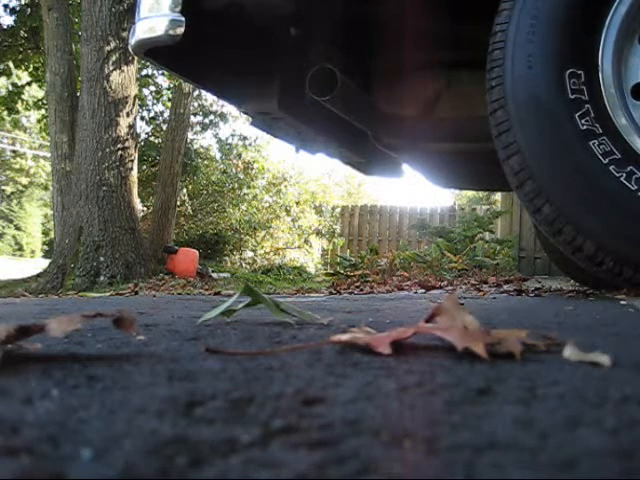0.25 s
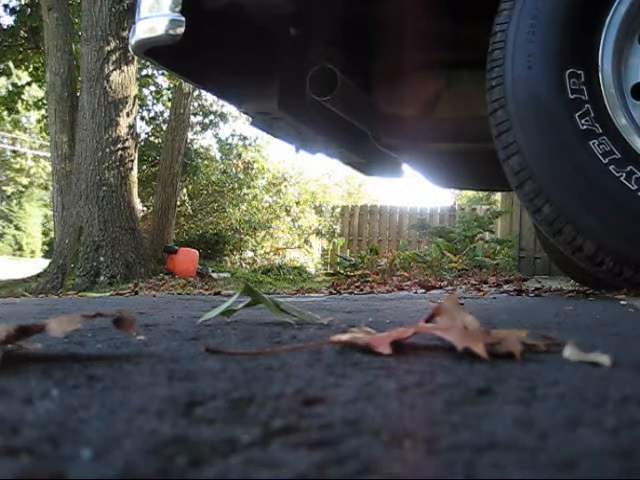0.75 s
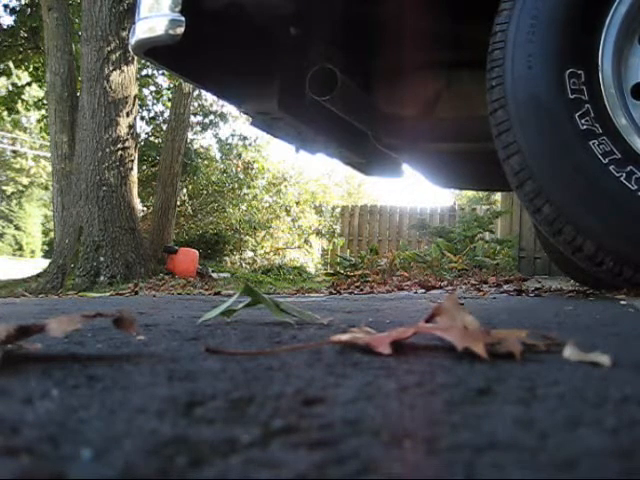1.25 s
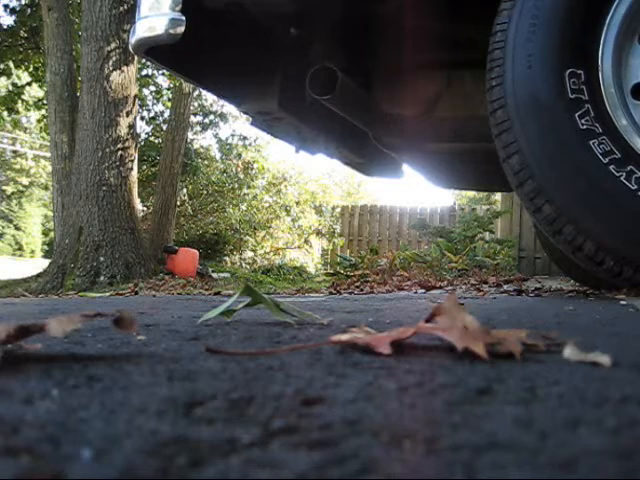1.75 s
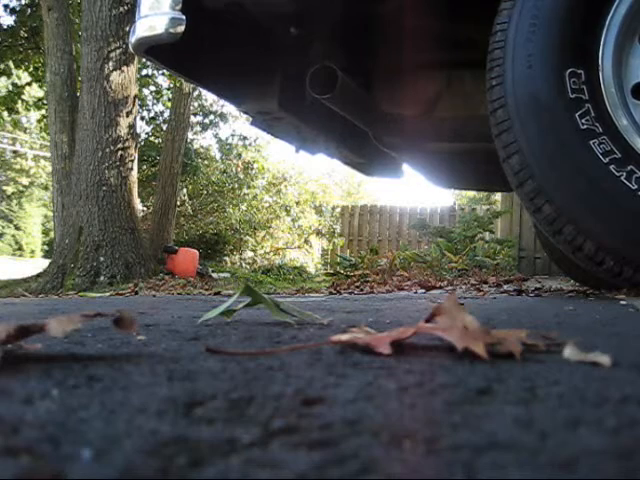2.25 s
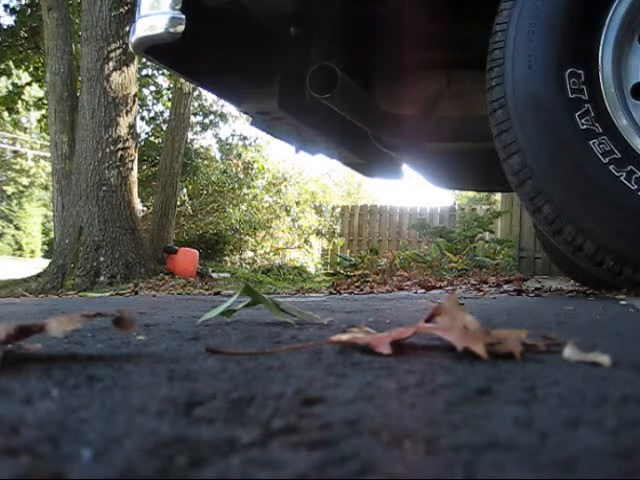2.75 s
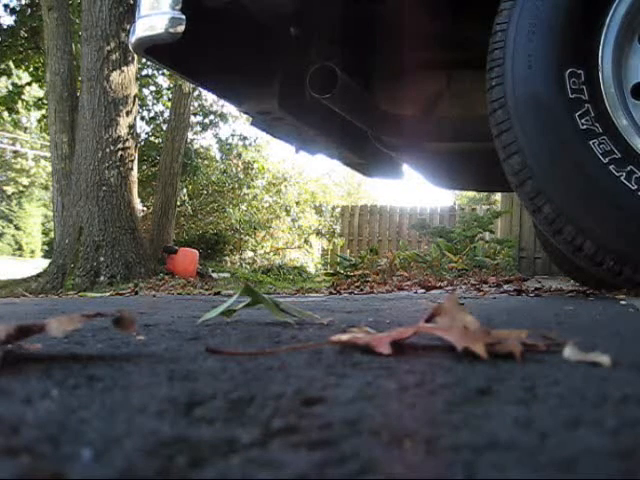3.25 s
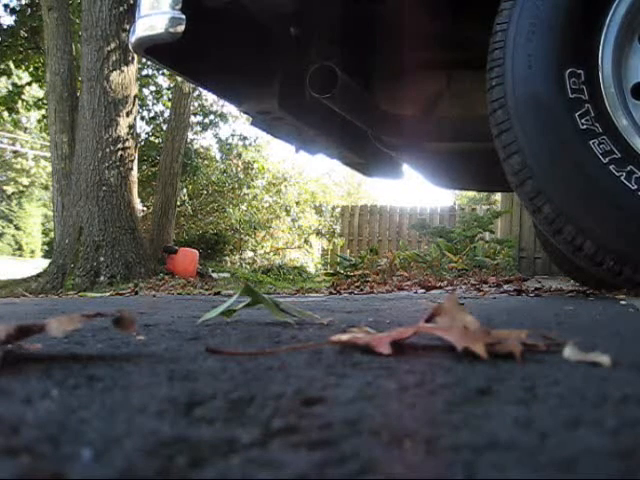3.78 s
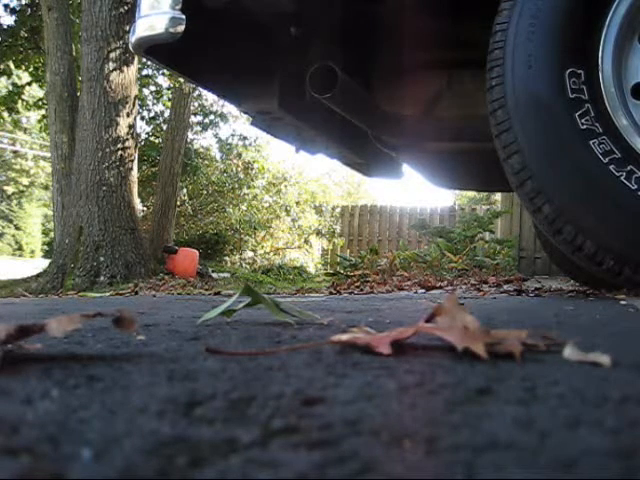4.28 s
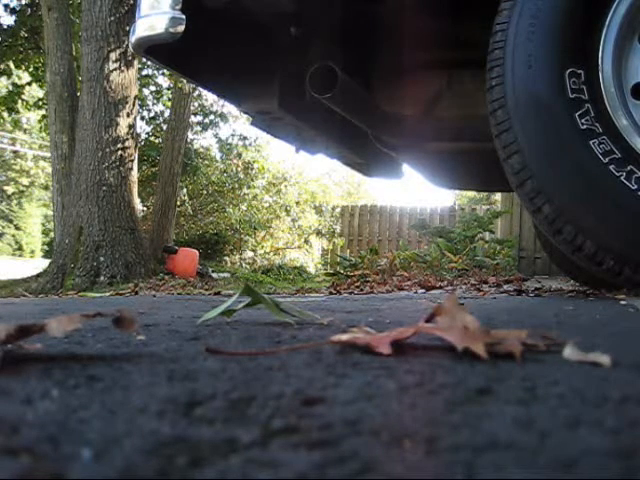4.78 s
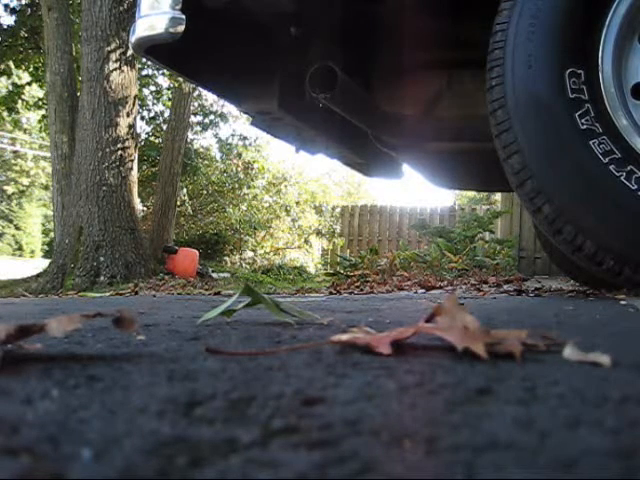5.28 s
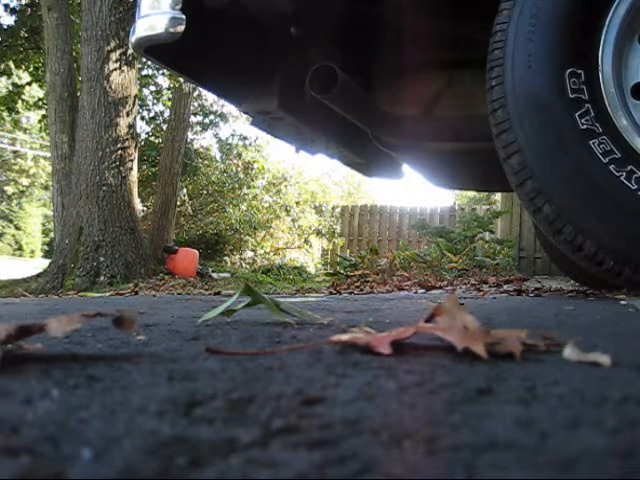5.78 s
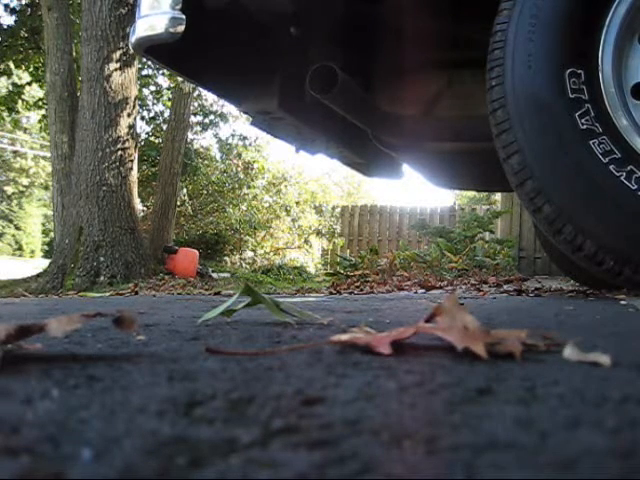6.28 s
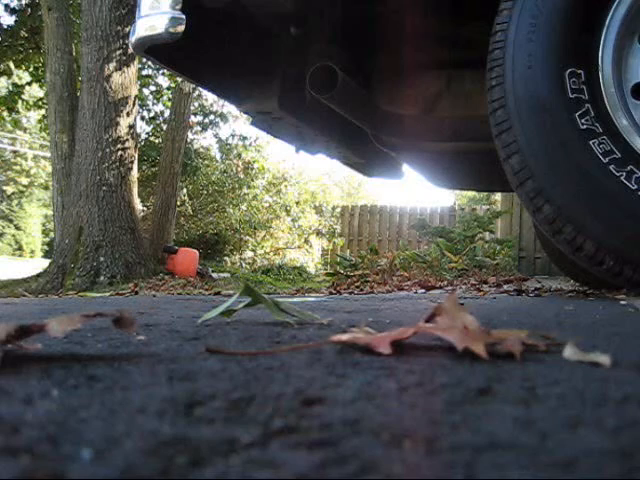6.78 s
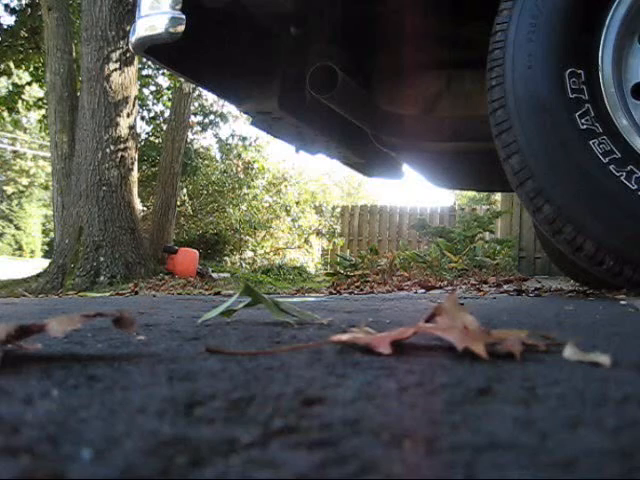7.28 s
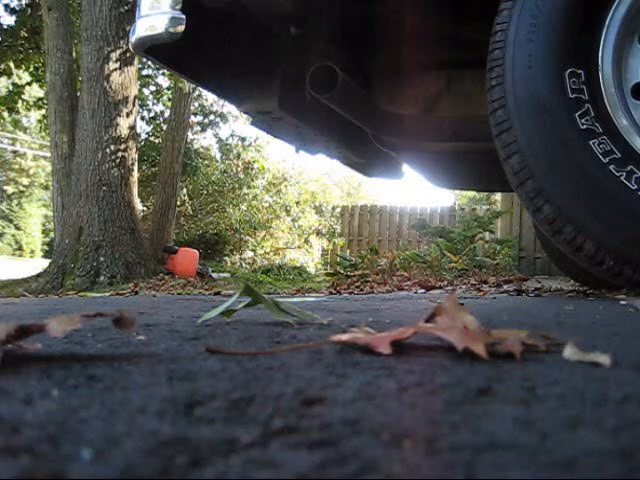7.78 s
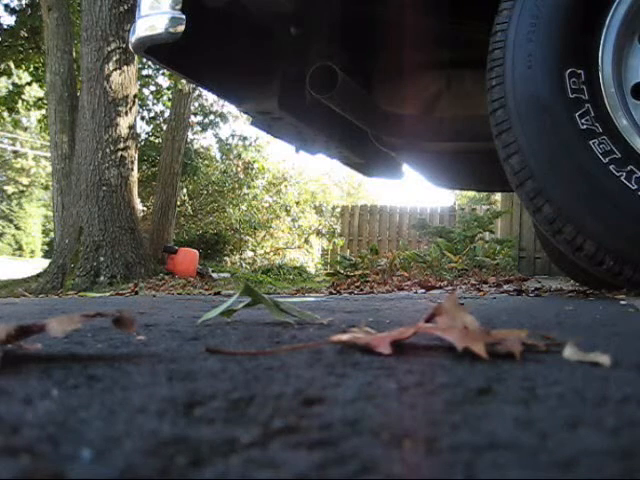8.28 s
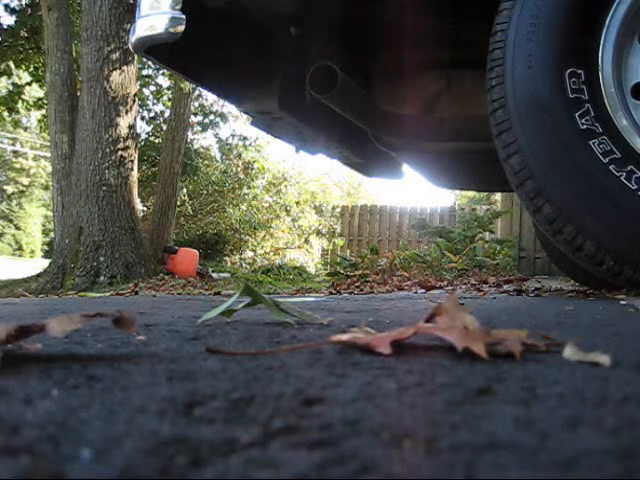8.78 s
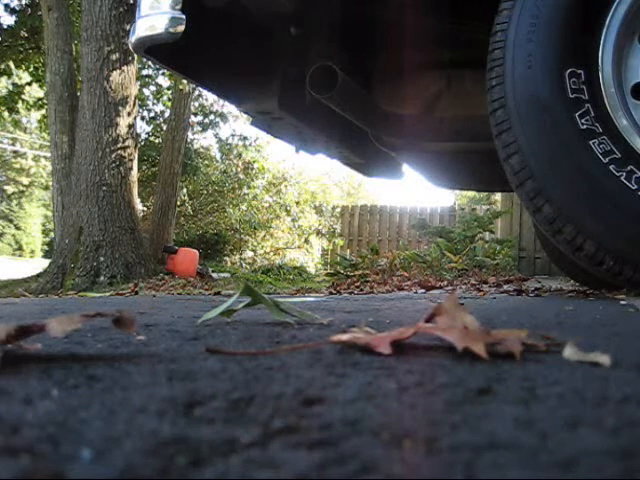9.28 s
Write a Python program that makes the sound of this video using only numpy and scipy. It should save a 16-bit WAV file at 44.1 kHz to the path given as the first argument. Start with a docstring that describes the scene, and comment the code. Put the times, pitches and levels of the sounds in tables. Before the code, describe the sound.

Crickets chirp outdoors as a truck door bangs shut; the V8 cranks, fires up with a roar and sinks toward a steady idle.

```python
"""A V8 truck starts up on a garden driveway, heard from the ground beside it.
The door slams and the body shakes; later the starter clunks in and whines over two compressions.
The engine catches, flares and sinks towards idle: its firings beat in the exhaust under fan roar,
intake hiss and alternator whine, while the freed starter spins down.
Behind it are crickets, a few bird calls and a soft bed of leaves and distant traffic."""
import sys
import numpy as np
from scipy.fft import rfft, irfft, next_fast_len
from scipy.io import wavfile
from scipy.ndimage import map_coordinates

SR = 44100
rng = np.random.default_rng(int(sys.argv[2]) if len(sys.argv) > 2 else 0)


def pcm_store(signal):
    """Save signal as 16-bit PCM."""
    levels = np.round(np.clip(np.atleast_2d(signal), -1, 1) * 32767)
    wavfile.write(sys.argv[1], SR, levels.astype(np.int16).T)


N = 420713
TIME = np.arange(N) / SR
CATCH_S = 5.245  # the engine fires up


def amp(db):
    """Decibels to gain."""
    return 10 ** (np.asarray(db) / 20)


def unit(x):
    """x scaled to rms 1."""
    return x / np.sqrt(np.mean(x ** 2) + 1e-20)


def noise():
    """White noise."""
    return rng.standard_normal(N)


def wobble(rate):
    """A smooth random modulator, rate knots a second."""
    return map_coordinates(rng.standard_normal(int(N * rate / SR) + 4), [TIME * rate], order=2)


def hump(x, centre, width):
    """A bell curve of height 1."""
    return np.exp(-((x - centre) / width) ** 2)


def envelope(start, attack, hold, t60, t=TIME):
    """A straight rise, a hold, then a fall of 60 dB in t60."""
    return np.clip((t - start) / attack, 0, 1) * amp(-60 * np.maximum(t - start - attack - hold, 0) / t60)


def turns(hz):
    """Cycles completed at a changing frequency."""
    return np.cumsum(hz) / SR


def tone(hz, blur, rate):
    """A sine of rms 1 whose pitch trembles by the share blur."""
    return np.sqrt(2) * np.sin(2 * np.pi * turns(hz * (1 + blur * wobble(rate))))


def eq_gain(points, hz):
    """Gain of an EQ curve of (f/Hz, level/dB) points on a log axis."""
    f, db = np.transpose(points)
    return amp(np.interp(np.log(hz + 1), np.log(f), db))


def filtered(x, response):
    """x times a complex response of frequency."""
    size = next_fast_len(N + SR // 2)
    return irfft(rfft(x, size) * response(np.fft.rfftfreq(size, 1 / SR)), size)[..., :N]


def coloured(x, points):
    """x through an EQ curve, at rms 1."""
    return unit(filtered(x, lambda hz: eq_gain(points, hz)))


def resonate(x, modes):
    """x through (f/Hz, width/Hz, level/dB) resonances of alternating polarity, at rms 1."""
    def response(f):
        return sum((-1) ** k * amp(db) * 1j * f * width / (hz * hz - f * f + 1j * f * width)
                   for k, (hz, width, db) in enumerate(modes))
    return unit(filtered(x, response))


def standing_waves(x, peaks, width_hz, widening):
    """x through narrow peaks that broaden with frequency."""
    def response(f):
        return sum(amp(db) / (1 + ((f - hz) / (width_hz + widening * hz)) ** 2) for hz, db in peaks)
    return filtered(x, response)


def strikes(rows, octaves, attack_share):
    """Each hit is a dying band of noise whose attack is a share of its t60."""
    out = np.zeros(N)
    t = TIME[:SR]
    hz = np.fft.rfftfreq(SR, 1 / SR) + 1
    for start, db, centre_hz, t60 in rows:
        band = hump(np.log2(hz / centre_hz), 0, octaves)
        burst = unit(irfft(rfft(rng.standard_normal(SR)) * band, SR))
        rise = 1 - np.exp(-t / (attack_share * t60))
        out[round(start * SR):][:SR] += burst * rise * amp(db - 60 * t / t60)
    return out


def whistles(rows, blur, rate):
    """Each whistle slides to its end pitch and levels off, under an arch of loudness."""
    out = np.zeros(N)
    for start, length, start_hz, end_hz, db in rows:
        progress = np.clip((TIME - start) / length, 0, 1)
        hz = start_hz + (end_hz - start_hz) * np.sin(np.pi / 2 * progress)
        out += amp(db + 2.1 * wobble(100)) * np.sin(np.pi * progress) * tone(hz, blur, rate)
    return out


# EQ of the garden bed: f/Hz, level/dB
GARDEN_EQ = [(25, -17), (60, -6.5), (130, -5.5), (250, -6.5), (600, -2.5), (1000, -3.5), (1500, -6),
             (2900, -6), (4400, -10.5), (6500, -10.5), (7200, -13), (10100, -15.5), (12500, -22),
             (15500, -25.5)]

def garden():
    """Leaves and distant traffic make a soft, even wash."""
    return amp(-36 + 0.46 * wobble(3.52)) * coloured(noise(), GARDEN_EQ)


def crickets():
    """A near cricket repeats one dipping chirp; a far one sings higher and faster over a faint chorus."""
    since = (TIME - .094) % .107  # a chirp every 107 ms
    dip = hump(since, .029, 0.013)
    hz = 5077 - 188 * dip
    scrape = 0.00406 + 0.0222 * dip  # the wing stroke turns raspy in the dip
    chirp = envelope(0, attack=0.0071, hold=0.055, t60=0.09, t=since)
    chirp *= amp(-37.5 - 2 * dip + 2.1 * wobble(90))
    overtone = amp(-14.5) * hump(since, .055, 0.012) * tone(2.02 * hz, blur=.004, rate=700)
    near = chirp * (tone(hz, scrape, rate=700) + overtone)
    stroke = TIME * 10.8 % 1
    far_chirp = amp(-45.5 + 2 * wobble(5)) * np.sin(np.pi * stroke) ** 2
    far = far_chirp * tone(6750 - 450 * stroke, blur=.018, rate=900)
    chorus = amp(-50 + 2.8 * wobble(23)) * tone(5900, blur=.05, rate=1500)
    return near + far + chorus


# thuds in the cab: t/s, level/dB, centre f/Hz, t60/s
CAB_THUDS = [(.368, -26, 506, 0.18), (1.573, -32, 100, 0.27), (1.578, -30.5, 540, 0.25),
             (2.35, -40, 60, .8), (2.41, -39, 240, 1.9), (4.014, -32, 170, 0.32)]

def cab_bumps():
    """Soft, dull knocks come from the cab."""
    return strikes(CAB_THUDS, octaves=1.2, attack_share=0.013)


# door and latch hits: t/s, level/dB, centre f/Hz, t60/s
DOOR_HITS = [(.807, 0, 911, 0.027), (.8095, -8.5, 7000, 0.048), (.8165, -26, 7500, .03),
             (.827, -14, 1700, .18)]
# EQ of the body's boom: f/Hz, level/dB
BOOM_EQ = [(13, -41), (22, -11), (54, 3), (86, -4), (172, 3), (198, -15), (238, 1), (300, -16), (390, -40),
           (660, -120)]
# bursts of panel rattle: t/s, level/dB, attack/s, hold/s, t60/s
RATTLE_BURSTS = [(0.806, -14, .002, .028, .3), (0.878, -21.5, .01, 0.078, 0.38),
                 (0.943, -18, 0.041, 0.027, 0.57)]
# EQ of the rattling panels: f/Hz, level/dB
PANEL_EQ = [(88, -32), (150, -11), (238, -6), (294, -12), (535, -2), (787, -9.5), (866, -5.5), (1050, -9.5),
            (1270, -3), (1800, -14), (2450, -13), (15000, -52)]

def door_slam():
    """Door and latch strike, then the body booms and the panels rattle."""
    hits = strikes(DOOR_HITS, octaves=1.47, attack_share=0.012)
    boom = amp(-26.5) * envelope(.812, attack=.022, hold=0.18, t60=0.69) * coloured(noise(), BOOM_EQ)
    rattle_power = sum((amp(db) * envelope(start, attack, hold, t60)) ** 2
                       for start, db, attack, hold, t60 in RATTLE_BURSTS)
    rattle = np.sqrt(rattle_power) * amp(1.3 * wobble(110)) * coloured(noise(), PANEL_EQ)
    return hits + boom + rattle


# falling lisps and rising chirps: t/s, length/s, start f/Hz, end f/Hz, level/dB
BIRD_LISPS = [(3.06, .4, 8200, 7800, -42), (3.92, .4, 8200, 7700, -43)]
BIRD_CHIRPS = [(3.28, 0.066, 1780, 1880, -38), (3.615, .05, 1900, 2200, -40),
               (4.128, 0.092, 2150, 2630, -33), (4.265, .025, 1710, 3200, -39),
               (4.315, 0.048, 2760, 3130, -38)]

def birds():
    """Birds whistle two thin falling lisps and a few short rising notes."""
    return whistles(BIRD_LISPS, blur=0.0256, rate=830) + whistles(BIRD_CHIRPS, blur=0.0314, rate=830)


# solenoid, pinion and flywheel hits: t/s, level/dB, centre f/Hz, t60/s
STARTER_HITS = [(4.468, -29.5, 5000, .2), (4.49, -24.5, 3370, 0.38), (4.563, -17.5, 2960, 0.22),
                (4.571, -16.5, 800, 0.21), (4.575, -23, 180, 0.18), (4.604, -10.5, 900, .091),
                (4.604, -13.5, 3360, 0.23), (4.6195, -7.5, 3650, 0.052), (5.05, -8, 2200, .015)]

def starter_clunk():
    """The solenoid throws the pinion into the ring gear, and it rings briefly."""
    ring = amp(-19) * envelope(4.569, attack=0.012, hold=0.036, t60=.03) * tone(820, blur=0.1393, rate=400)
    return strikes(STARTER_HITS, octaves=1.37, attack_share=0.0094) + ring


# gear mesh rate, dragged down by each compression: t/s, f/Hz
MESH_RATE = [(4.63, 1350), (4.72, 2650), (4.81, 3200), (4.865, 2600), (4.925, 1750), (5.03, 3550),
             (5.11, 3000), (5.19, 4350), (5.23, 5000)]
# partials of the gear whine: multiple of the mesh rate, level/dB
MESH_PARTIALS = [(.28, -3), (.63, -6), (1, 0), (1.3, -17)]
# EQ that the bell housing puts on the whine: f/Hz, level/dB
BELL_HOUSING_EQ = [(400, -10), (650, -3), (900, -2), (1150, -11), (1650, -8), (2000, 0), (2700, 0),
                   (3150, -5), (4400, -4), (6000, -18)]
# EQ of the gear grind: f/Hz, level/dB
GRIND_EQ = [(71, -75), (120, -62), (216, -11), (310, -15.5), (455, -2.5), (869, 0), (1000, -5),
            (1950, -7.5), (2690, -2.5), (3720, -11), (7400, -20), (13300, -38), (15000, -53)]
# resonances of the starter housing: f/Hz, width/Hz, level/dB
HOUSING_MODES = [(870, 49, -9), (1360, 5.9, 2), (1474, 24, -1), (1940, 200, -8), (2470, 84, -8)]
# bright EQ of the gear rasp, shared with the intake's coughs and hiss: f/Hz, level/dB
HISS_EQ = [(2060, -23.5), (3500, -2), (4490, 1), (5690, 2.5), (7430, 0.5), (13900, -22.5), (14800, -39),
           (15500, -52)]
# gear squeal on the second compression: t/s, length/s, start f/Hz, end f/Hz, level/dB
GEAR_SQUEALS = [(5.01, .11, 2550, 1795, -21.5)]

def starter_cranking():
    """The pinion whines on the ring gear and grinds in the housing until the engine catches."""
    mesh_hz = np.interp(TIME, *np.transpose(MESH_RATE))
    teeth = amp(1.2 * np.sin(2 * np.pi * turns(mesh_hz / 18)) + 1.2 * wobble(120))  # peaks each pinion turn
    gears = np.zeros(N)
    for multiple, db in MESH_PARTIALS:
        hz = multiple * mesh_hz
        gears += amp(db + 2.5 * wobble(130)) * eq_gain(BELL_HOUSING_EQ, hz) * tone(hz, blur=.04, rate=600)
    sweet_spot = hump(np.log2(mesh_hz / 2780), 0, 1.5)  # loudest between stall and free spin
    whine = amp(-22.5) * sweet_spot * teeth * gears * envelope(4.65, attack=0.024, hold=0.53, t60=.1)
    grind = amp(-19.5) * coloured(noise() * teeth, GRIND_EQ)
    housing = amp(-22.5) * resonate(noise() * teeth, HOUSING_MODES)
    rasp = amp(-27.5 + 8 * np.log2(mesh_hz / 3080)) * coloured(noise() * teeth, HISS_EQ)
    squeal = whistles(GEAR_SQUEALS, blur=.045, rate=720)
    engaged = envelope(4.6, attack=0.098, hold=0.526, t60=0.92)
    return whine + squeal + (grind + housing + rasp) * engaged


# coughs through the intake: t/s, level/dB, t60/s
INTAKE_COUGHS = [(5.148, -29, .3), (5.263, -21, 0.14)]

def intake_coughs():
    """Short puffs of hiss as the first cylinders fire."""
    puffs = sum(amp(db) * envelope(start, attack=.01, hold=0.0099, t60=t60)
                for start, db, t60 in INTAKE_COUGHS)
    return puffs * coloured(noise(), HISS_EQ)


def flare(decay_s, hold_s=0.13):
    """A control that holds at 1 until just after the catch, then dies away."""
    return np.exp(-np.maximum(TIME - CATCH_S - hold_s, 0) / decay_s)


# engine speed as a firing rate: t/s, f/Hz
FIRING_RATE = [(5.25, 28), (5.5, 85), (5.68, 108), (5.8, 114.5), (5.95, 115.5), (6.2, 111), (6.5, 104.5),
               (6.8, 100.5), (7.5, 94), (8.0, 86.5), (8.7, 80.5), (8.95, 76.3), (9.2, 73.8), (9.54, 73.3)]
# punch of each cylinder in firing order: level/dB
CYLINDER_LEVELS = [3, -1.5, -1, -4, -2, -1, 0, -3]

def engine():
    """Eight uneven firings a cycle drive the engine layers; the intake hiss sinks as the throttle shuts."""
    firing_hz = np.interp(TIME, *np.transpose(FIRING_RATE))
    fired = turns(firing_hz)
    index = fired.astype(int)
    scatter_db = 1.7 * rng.standard_normal(index[-1] + 1)
    punch = amp(np.take(CYLINDER_LEVELS, index, mode="wrap") + scatter_db[index])
    pulses = unit(np.diff(index, prepend=0) * punch)
    puff = punch * np.exp(-(fired % 1) / .6)  # gas rushes out after each valve opens
    throttle = flare(decay_s=0.63)
    hiss = amp(-33 + 13.5 * throttle) * coloured(noise() * (1 + 1.2 * puff), HISS_EQ)
    running = np.clip((TIME - CATCH_S) / 0.12, 0, 1)
    rush = hiss + roar(pulses, puff) + fan(firing_hz, throttle, puff)
    return (rush + exhaust(fired) + alternator(firing_hz)) * running


# standing waves in the tailpipe and under the truck: f/Hz, level/dB
DRONE_PEAKS = [(92, -5), (184, -11), (278, -4), (436, -4.5), (472, -0.5), (548, -0.5), (615, -2),
               (637, -1.5), (668, 0.5), (696, 3.5), (745, -1), (856, -2.5), (942, -2), (1051, -5.5),
               (1200, -4), (1277, -2.5), (1339, -7.5), (1372, -0.5), (1472, -5), (1739, -7.5), (1920, -8.5),
               (2250, -14), (2700, -5.5), (3130, -9.5), (3284, -3.5)]
# resonances under the truck: f/Hz, width/Hz, level/dB
UNDERBODY_MODES = [(657, 81, 8.5), (1320, 110, -5), (1750, 53, -17)]

def roar(pulses, puff):
    """Firings and rushing gas ring the tailpipe and underbody, building after the catch."""
    drone = unit(standing_waves(0.35 * pulses + noise(), DRONE_PEAKS, width_hz=9.9, widening=0.0022))
    underbody = resonate(0.08 * pulses + unit(noise() * (0.61 + puff)), UNDERBODY_MODES)
    build = amp(-14 * flare(decay_s=.45))
    return build * (amp(-20.5) * drone + amp(-26) * underbody)


# EQ of the fan's rush: f/Hz, level/dB
FAN_EQ = [(24, -54), (40, -47), (82, -9), (183, -12), (218, -14), (280, -10.5), (317, -7), (438, -5.5),
          (577, -12.5), (686, -7), (797, -6.5), (2270, -4), (6980, -16), (13300, -30.5), (15500, -48)]

def fan(firing_hz, throttle, puff):
    """The fan's rush grows with speed, lags during the flare and flutters with the firings."""
    level_db = -19 + 2.5 * np.log2(firing_hz / 96.7) - 1.5 * throttle
    return amp(level_db) * coloured(noise() * (1 + .5 * puff), FAN_EQ)


def starter_coasting():
    """The freed starter races, then friction slows it evenly: a hoarse whistle and its octave."""
    top_s, top_hz, race_hz_per_s, slow_hz_per_s, loudest_hz = 5.5, 7000, 6000, 4900, 5400
    since = TIME - top_s
    mesh_hz = np.maximum(top_hz + np.minimum(race_hz_per_s * since, -slow_hz_per_s * since), 1)
    whistle = sum(hump(np.log2(hz / loudest_hz), 0, .65) * tone(hz, blur=.055, rate=1200)
                  for hz in (mesh_hz, 2 * mesh_hz))
    return amp(-29) * whistle * envelope(CATCH_S, attack=0.27, hold=0.8, t60=1.1)


# exhaust partials, with fan blade tones at the fractional orders: multiple of the cycle rate, level/dB
ENGINE_ORDERS = [(3, -23), (4, -23), (7, -19), (8, -1.5), (9, -12), (11, -13), (12, -8.5), (15, -20),
                 (16, -5.5), (17, -5), (19, -19), (20, -17), (21.2, -8), (23, -24), (24, -8.5), (40, -7),
                 (42.3, -5), (59.7, 0.5)]
# tailpipe resonances: f/Hz, level/dB
TAILPIPE_PEAKS = [(152, -8), (185, 3.5), (279, 10), (392, 2), (442, 2), (470, -2), (550, 0)]

def exhaust(fired):
    """Engine orders swell as they cross the pipe's resonances, over a low rumble."""
    tilt_db_per_octave = 6 * flare(decay_s=1)  # the firing note leads, then the others fill in
    partials = np.zeros(N)
    for order, db in ENGINE_ORDERS:
        ratio = order / len(CYLINDER_LEVELS)
        gain = amp(db - tilt_db_per_octave * abs(np.log2(ratio)) + 1.9 * wobble(5))
        partials += gain * np.sqrt(2) * np.sin(2 * np.pi * (fired * ratio + rng.random()))
    partials *= amp(1.44 * wobble(45))
    piped = partials + standing_waves(partials, TAILPIPE_PEAKS, width_hz=7, widening=.006)
    beat = amp(-34.5) * np.interp(TIME, [5.32, 5.46], [0, 1]) * piped
    shudder = amp(-32.5) * envelope(5.31, attack=0.086, hold=0.069, t60=0.37)  # the first firings
    rumble = (amp(-48.5) + shudder) * resonate(noise(), [(40, 20, 0), (85, 14, 0)])
    return beat + rumble


# swells of the alternator whine: t/s, half width/s, boost/dB
ALTERNATOR_SWELLS = [(6.2, 0.071, 5.5), (6.72, 0.087, 6.5), (7.04, .09, 7), (8.3, 0.17, 2.5),
                     (9.07, 0.12, 7), (9.46, 0.035, 4)]

def alternator(firing_hz):
    """A thin whine tracks the engine speed; it fades in after the flare and swells now and then."""
    swell_db = sum(db * hump(TIME, peak_s, width) for peak_s, width, db in ALTERNATOR_SWELLS)
    fade_in = np.interp(TIME, [5.8, 6.2], [0, 1])
    whine = tone(22.75 * firing_hz, blur=0.0086, rate=200)
    return fade_in * amp(-30.5 + swell_db + 1.6 * wobble(20)) * whine


def scene():
    """Garden and truck are mixed in mono and sent to both channels."""
    ambience = garden() + crickets() + birds()
    body = cab_bumps() + door_slam()
    start_up = starter_clunk() + starter_cranking() + intake_coughs() + engine() + starter_coasting()
    mono = ambience + body + start_up
    return np.array([mono, mono])


def record(dry):
    """A soft clipper rounds the loudest peaks and a brick-wall low-pass trims the top."""
    cutoff_hz = 15450
    clipped = dry / (1 + np.abs(dry) ** 6) ** (1 / 6)
    return filtered(clipped, lambda hz: hz < cutoff_hz)


dry = scene()
out = record(dry)
pcm_store(out)
```